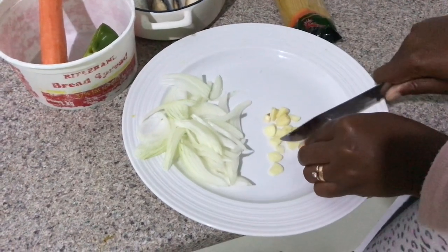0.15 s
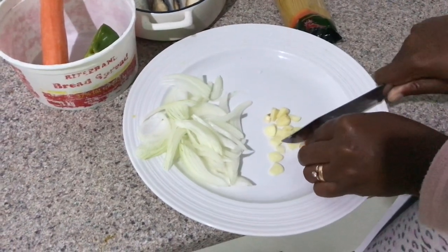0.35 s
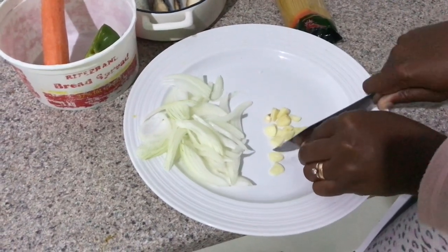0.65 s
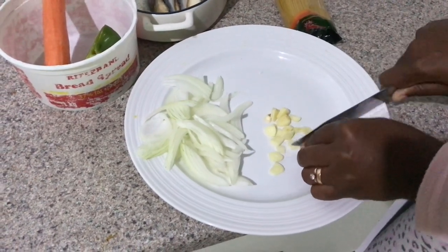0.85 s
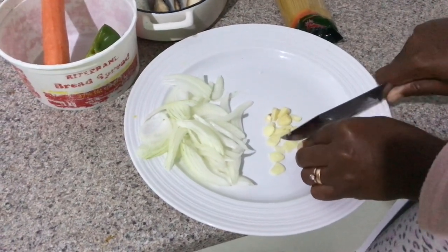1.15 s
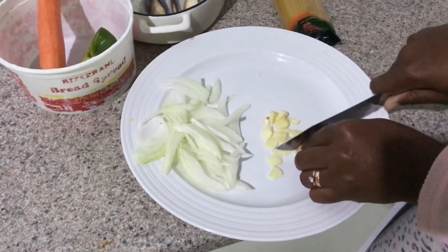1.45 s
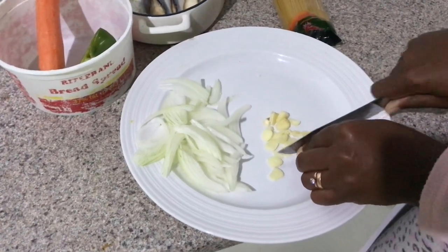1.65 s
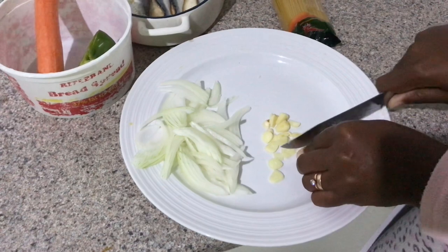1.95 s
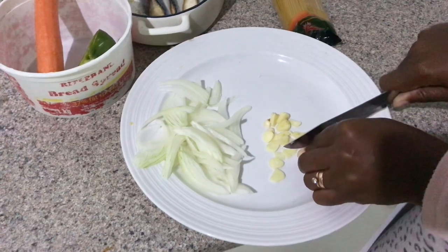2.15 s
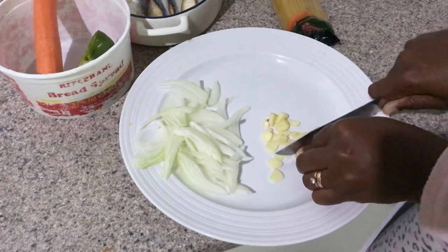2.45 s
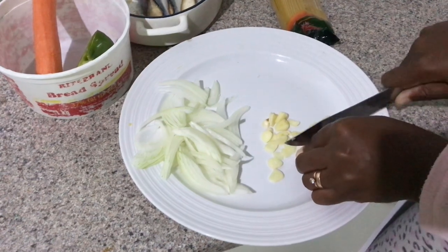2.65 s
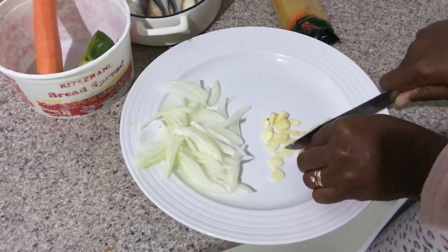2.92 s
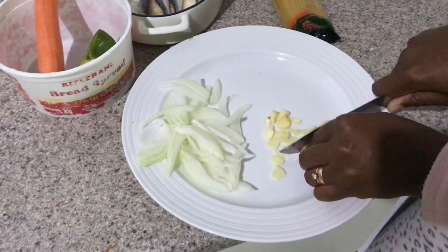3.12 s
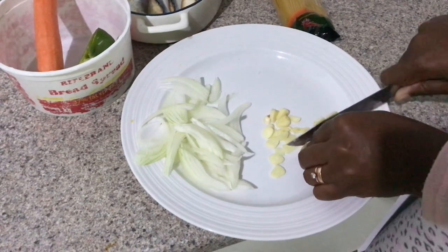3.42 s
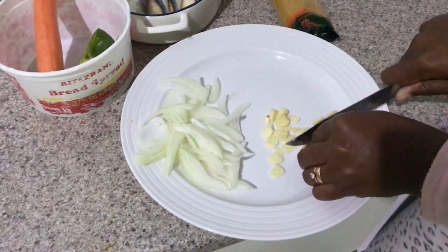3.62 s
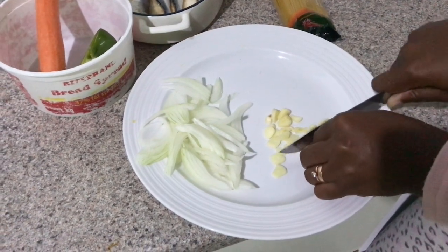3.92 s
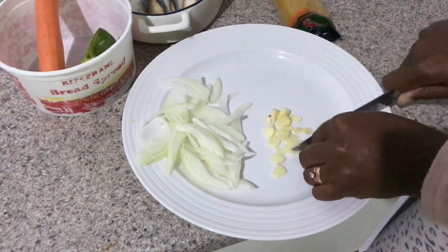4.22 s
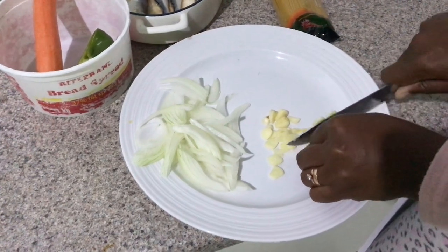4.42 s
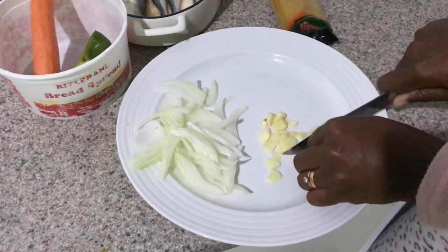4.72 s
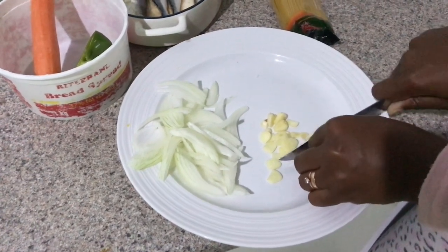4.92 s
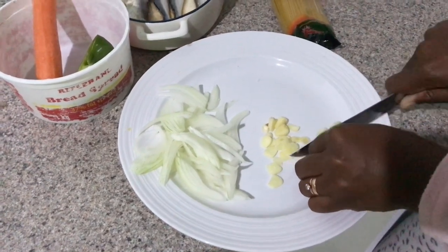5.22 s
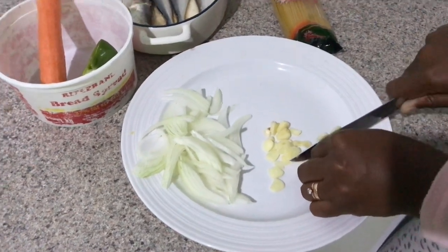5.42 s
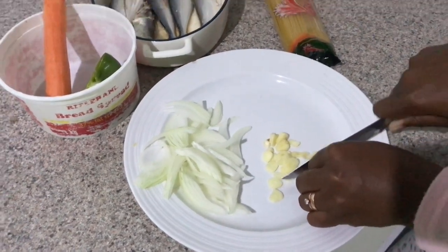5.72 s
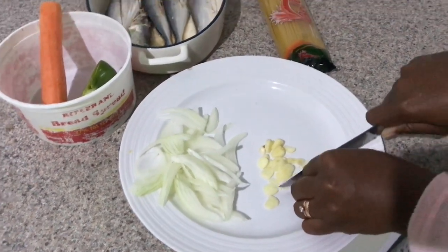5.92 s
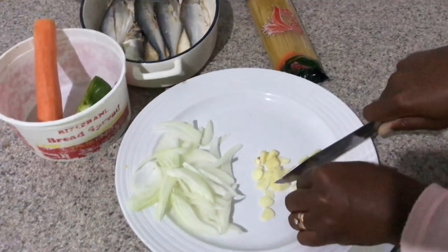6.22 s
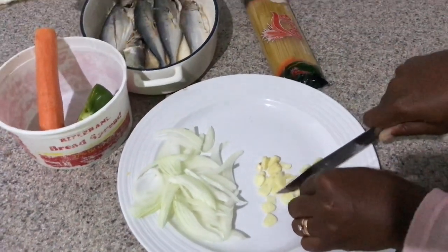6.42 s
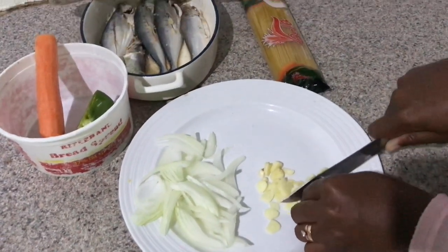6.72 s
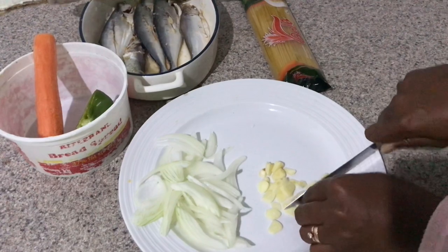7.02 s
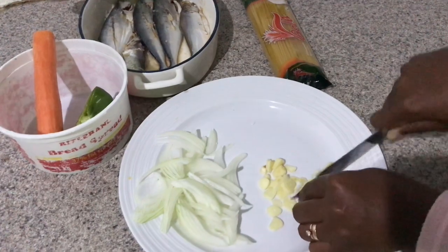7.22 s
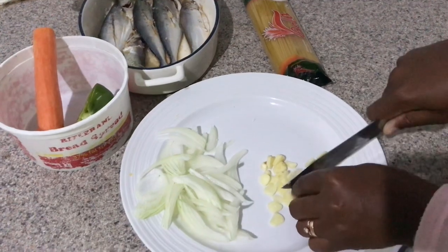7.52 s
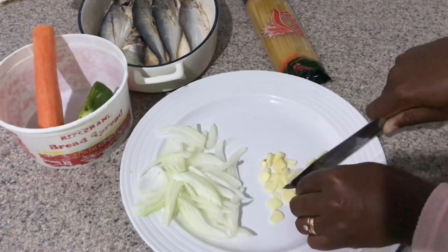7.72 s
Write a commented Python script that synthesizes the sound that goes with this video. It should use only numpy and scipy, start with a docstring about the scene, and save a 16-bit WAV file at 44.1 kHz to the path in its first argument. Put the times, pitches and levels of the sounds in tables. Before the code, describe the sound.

Eight hard clicks of a steel blade on a plate, unhurried and roughly a second apart, each noisy at the onset and ringing only briefly, with a short lively room tail. Between them the edge presses faintly through garlic, crunching softly, slices ticking wetly, with a brief scrape or two. Low muffled thumps from the hand holding the close microphone lie over faint steady hiss.

```python
"""A kitchen knife snaps down on a ceramic plate, about once a second: damped modes ring under a noisy crack.
Before most blows the edge crunches faintly through garlic, as unevenly modulated noise; slices tick wetly.
The plate knocks and booms on the worktop, and a small hard-walled kitchen answers with decaying noise.
The hand on the camera adds soft sagging bumps and rumble over a quiet hiss."""
import sys
import numpy as np
from scipy import signal
from scipy.fft import rfft, irfft, next_fast_len
from scipy.io import wavfile
from scipy.ndimage import map_coordinates

SR = 44100
rng = np.random.default_rng(int(sys.argv[2]) if len(sys.argv) > 2 else 0)


def int16_out(signal):
    """Quantize to a 16-bit WAV file."""
    q = np.round(np.clip(np.atleast_2d(signal).T, -1, 1) * 32767)
    wavfile.write(sys.argv[1], SR, q.astype(np.int16))


N = 346626
TIME = np.arange(N) / SR  # the whole scene, in s
AGE = np.arange(SR) / SR  # one second from the start of an event, in s

# Blade meets plate; the spot runs from -1 to 1 along the edge, crack and knock are relative levels.
# Columns: start_s, blow_db, brightness_db_per_octave, contact_spot, crack_db, knock_db
BLOWS = [(-.3, 0, -2.5, 0.77, -22, -42), (.624, -3, -0.55, -0.57, -20.5, -40),
         (1.537, 0.5, 1.5, -0.63, -22, -33.5), (2.344, 4, 1, -0.39, -21, -31.5),
         (3.075, 0.5, 0.8, -0.073, -22, -33.5), (4.045, 1, 0, -0.14, -26.5, -37.5),
         (4.8735, 0.5, 1.23, 0.98, -22, -35), (5.815, 1, 1.5, 0.56, -23, -35.5),
         (6.81, -.5, 0.86, 0.45, -23.5, -33.5)]
# Modes of the plate rocking on the worktop.
# Columns: pitch_hz, relative_level_db, t60_s
ROCKING_MODES = [(163, -10.5, 0.031), (246, -4.5, .06), (337, -3.5, 0.052), (429, 0, 0.037),
                 (440, -5, 0.067), (649.3, -5, 0.14), (704.3, 2.5, 0.06), (820, -1.5, 0.084),
                 (962, -6, 0.063), (1020, -0.5, 0.037)]


def blade_on_plate(knock_rise_s=0.0034):
    """Impact excitation: a hard blow rings the plate and rocks it against the worktop."""
    out = np.zeros(N)
    hz, mode_db, t60 = np.transpose(ROCKING_MODES)[:, :, None]
    for start, blow_db, bright_db, spot, crack_db, knock_db in BLOWS:
        phase = rng.random(hz.shape)
        modes = amp(mode_db) * fade(AGE, t60) * np.sin(2 * np.pi * (hz * AGE + phase))
        knock = amp(knock_db) * modes.sum(axis=0) * (1 - np.exp(-AGE / knock_rise_s))
        blow = amp(blow_db) * clink(bright_db, spot, crack_db=crack_db)
        add(out, start, blow + knock + in_kitchen(knock, wet_db=-2.0))
    return out


# Modes of plate and blade.
# Column: pitch_hz
MODE_HZ = [982, 1741, 1802, 2368, 2516, 2737, 2866, 3079, 3210, 3840, 4196, 4871, 6020, 6096, 6261, 7630,
           8226, 8368, 8497, 9044, 10530, 11543, 12214, 13030, 13485, 14076]
# The same modes in order; the last column is the gain as the contact spot moves by 1.
# Columns: relative_level_db, t60_s, spot_gain_db
MODE_RESPONSE = [(-30.5, 0.045, -7), (-26.5, .11, -4), (-26.5, 0.027, -6.5), (-33.5, 0.029, -10.5),
                 (-29, 0.017, -0.5), (-38, 0.022, 0), (-25.5, .07, -1.5), (-28.5, 0.059, -11.5),
                 (-23, 0.023, 2.5), (-40.5, .08, 1.5), (-28.5, 0.026, -6), (-43.5, .1, -6.5),
                 (-21.5, 0.083, 0), (-28.5, .04, 2.5), (-22.5, 0.049, 1.5), (-28.5, 0.055, 5),
                 (-17, 0.028, 0.5), (-20.5, .035, 3.5), (-22.5, 0.031, 1.5), (-34, .12, 6), (-35, .13, -4),
                 (-30, .065, 6.5), (-37, 0.06, 6.5), (-40, 0.076, 1.5), (-29.5, 0.048, 0.5),
                 (-39.5, .1, -1)]
# Relative spectrum of the contact's broad crack.
# Columns: frequency_hz, density_db
CRACK_SPECTRUM = [(60, -31.5), (250, -5.5), (620, -5), (950, 6.5), (1420, -22.5), (2400, -1), (3200, 11.5),
                  (3700, -7.5), (5200, -7), (8500, -6), (9800, -4), (13300, 0.5), (15000, -13)]
CRACK_T60_S = .014


def clink(bright_db, spot=0, scatter_db=0.0, attack_s=0.0005, crack_db=-21, chatter_s=0.0025,
          spread_t60_s=0.11, beam_hz=7000):
    """Modal superposition: decaying plate modes plus the crack of steel on glaze, with the room's answer."""
    hz = np.array(MODE_HZ)[:, None]
    mode_db, t60, spot_db = np.transpose(MODE_RESPONSE)[:, :, None]
    t = AGE[:SR // 4]

    def hardness(f):
        """Contact stiffness: a spectral tilt about 4 kHz, constant below 1 kHz."""
        return amp(bright_db * np.log2(np.maximum(f, 1000) / 4000))

    # optional random level variation of each mode, off by default
    scatter = scatter_db * rng.standard_normal(hz.shape)
    strength = amp(mode_db + spot * spot_db + scatter) * hardness(hz)
    phase = rng.random(hz.shape)
    modes = strength * fade(t, t60) * np.sin(2 * np.pi * (hz * t + phase))
    ring = modes.sum(axis=0) * (1 - np.exp(-t / attack_s))
    # the edge chatters for a moment before it settles: the crack holds its level, then decays
    settling = fade(np.maximum(t - chatter_s, 0), CRACK_T60_S)
    crack = amp(crack_db) * filtered(noise(CRACK_SPECTRUM, len(t)), hardness) * settling
    # the first burst fills the room; the late ring and the crack's treble are mostly heard directly
    wide_crack = filtered(crack, lambda f: 1 / np.sqrt(1 + (f / beam_hz) ** 2))
    spread = ring * fade(t, spread_t60_s) + wide_crack
    direct, spread = np.pad([ring + crack, spread], [(0, 0), (0, SR - len(t))])
    return direct + in_kitchen(spread, wet_db=-1.5)


# Relative spectrum of low rumble, shared by worktop, pressing blade and hand.
# Columns: frequency_hz, density_db
RUMBLE_SPECTRUM = [(20, -34), (40, -7), (62, 4), (110, 0.5), (170, -8.5), (250, -18.5), (450, -33.5),
                   (1000, -72)]
BOOM_DB, BOOM_T60_S, BOOM_RISE_S = -17.5, 1, .012  # level is relative to each knock


def worktop_boom():
    """Structure-borne sound: each knock leaves a low decaying boom in proportion to its strength."""
    out = np.zeros(N)
    for start, *_, knock_db in BLOWS:
        envelope = (1 - np.exp(-AGE / BOOM_RISE_S)) * fade(AGE, BOOM_T60_S)
        add(out, start, amp(knock_db + BOOM_DB) * noise(RUMBLE_SPECTRUM, SR) * envelope)
    return out


# The edge scrapes the glaze near a blow or a cut.
# Columns: start_s, relative_level_db, length_s, brightness_db_per_octave
SCRAPES = [(0.576, -40.5, 0.046, -6), (.892, -29.5, 0.068, -7), (3.051, -28.5, .02, -1.5)]


def scraping(slips_per_s=1100, uneven_db=3):
    """Stick-slip friction: the edge catches and slips on the glaze in a random run of tiny clinks."""
    out = np.zeros(N)
    for start, level_db, length, bright_db in SCRAPES:
        sizes = np.sign(rng.standard_normal(SR)) * amp(uneven_db * rng.standard_normal(SR))
        slips = sizes * (rng.random(SR) < slips_per_s / SR) * (AGE < length)
        impulses = unit(slips) / np.sqrt(SR)  # total energy 1
        add(out, start, amp(level_db) * signal.fftconvolve(impulses, clink(bright_db)))
    return out


# The blade enters the clove and cuts until it meets the plate; levels are relative.
# Columns: start_s, tap_db, crunch_db, wet_hiss_db
SLICES = [(.405, -51, -62.5, -66), (1.387, -40, -56.5, -64.5), (2.255, -52.5, -59.5, -63.5),
          (2.897, -32, -55.5, -65), (3.786, -41.5, -61.5, -67.5), (4.685, -40.5, -59.5, -65.5),
          (5.623, -47, -60, -62.5)]
# Relative spectrum of the crunch.
# Columns: frequency_hz, density_db
CRUNCH_SPECTRUM = [(80, -10.5), (300, 11), (600, -4), (1000, 1.5), (1450, -13.5), (1770, -1.5),
                   (2150, -16.5), (2900, -15), (4500, -21.5), (6100, -32), (9000, -22)]
# Relative spectrum of the wet hiss.
# Columns: frequency_hz, density_db
JUICE_SPECTRUM = [(2000, -25), (5000, -11.5), (8500, -4), (10000, -4.5), (13000, 2.5), (16000, -3)]
PRESS_DB = -61  # the worktop's rumble while the blade bears down


def slicing(grain_db=4, grains_per_s=600, uneven_db=8.5, catches_per_s=35, attack_s=0.0097, release_s=0.0079):
    """Fracture noise: a cushioned tap breaks the skin, then cells burst unevenly until the next blow."""
    out = np.zeros(N)
    for start, tap_db, crunch_db, hiss_db in SLICES:
        end = min(s for s, *_ in BLOWS if s > start)
        stroke = np.clip(AGE / attack_s, 0, 1) * np.clip((end - start - AGE) / release_s, 0, 1)
        cells = unit(amp(grain_db * wobble(grains_per_s) + uneven_db * wobble(catches_per_s)))
        # the plate carries the crunch, which eases as the clove gives way
        crunch = amp(crunch_db) * noise(CRUNCH_SPECTRUM, SR) * fade(AGE, t60=1.0)
        hiss = amp(hiss_db) * noise(JUICE_SPECTRUM, SR)
        cut = stroke * cells * (crunch + hiss)
        press = amp(PRESS_DB) * stroke * noise(RUMBLE_SPECTRUM, SR)
        # the clove cushions the tap, so mainly the plate's low modes answer
        cushion = signal.butter(1, 2000, fs=SR, output="sos")
        tap = signal.sosfilt(cushion, clink(bright_db=-6.5, crack_db=-23.5))
        add(out, start, amp(tap_db + 4) * tap + cut + press + in_kitchen(cut, wet_db=-4.0))
    return out


# The clearest wet ticks of sticky slices.
# Columns: start_s, relative_level_db
CLEAR_TICKS = [(0.385, -51.5), (0.8921, -49.5), (0.923, -48), (1.3701, -45), (2.8797, -47), (4.6841, -42.5),
               (5.623, -45.5), (7.597, -47)]
# Relative spectrum of one tick.
# Columns: frequency_hz, density_db
TICK_SPECTRUM = [(3000, -19), (7000, -7), (10000, 0), (14000, 5), (16000, -0.5)]
# the fainter ticks come at random, on the same relative level scale, within plus or minus the spread
FAINT_TICKS_PER_S, FAINT_TICK_DB, FAINT_SPREAD_DB = 5.1, -58.5, 3.5


def wet_ticks():
    """Adhesive release: sticky slices part in short noise bursts, a few clear among many faint ones."""
    out, t = np.zeros(N), AGE[:SR // 20]
    chance = rng.random((round(FAINT_TICKS_PER_S * N / SR), 2))
    faint = [(when * N / SR, FAINT_TICK_DB + FAINT_SPREAD_DB * (2 * size - 1)) for when, size in chance]
    for start, level_db in CLEAR_TICKS + faint:
        add(out, start, amp(level_db - 3.0) * noise(TICK_SPECTRUM, len(t)) * fade(t, t60=0.016))
    return out


# Decay of the room's diffuse tail.
# Columns: frequency_hz, t60_s
ROOM_DECAY = [(150, .75), (400, .75), (1000, .7), (2800, .66), (6000, .56), (8500, .48), (11500, .39),
              (13500, .34), (15500, .22)]
# Colour that the walls give the tail.
# Columns: frequency_hz, reflected_db
WALL_COLOUR = [(200, 6.5), (700, -1.5), (1750, 5.5), (2550, 4), (3250, -8.5), (4200, 0), (6200, -6),
               (8300, -9), (11000, -3.5), (13500, -1), (15000, -8.5)]


def in_kitchen(x, wet_db=-4.0, early_db=-10, early_t60_s=0.1, build_s=0.0026):
    """Reverberation: quick worktop reflections and the room's diffuse tail, without the direct sound."""
    hz, t, cells = signal.stft(rng.standard_normal(SR), SR, nperseg=256)
    decaying = cells * fade(t, along(ROOM_DECAY, hz)[:, None])
    tail = unit(signal.istft(decaying, SR, nperseg=256)[1][:SR]) / np.sqrt(SR)
    tail = filtered(tail, lambda f: amp(along(WALL_COLOUR, f))) * (1 - np.exp(-AGE / build_s))
    # the reflections arrive after the first millisecond
    early = rng.standard_normal(SR) * fade(AGE, early_t60_s) * (AGE > .001)
    early = unit(early) / np.sqrt(SR)
    return signal.fftconvolve(x, amp(wet_db) * tail + amp(early_db) * early)[:len(x)]


# The hand shifts its grip on the camera.
# Columns: start_s, length_s, rumble_db
GRIP_SHIFTS = [(.44, 0.16, -46), (1.01, 0.33, -48.5), (1.4, 0.31, -52), (1.85, 0.14, -60.5),
               (2.17, .14, -58), (2.91, 0.086, -53.5), (3.48, 0.073, -62), (4.82, 0.073, -49),
               (5.15, 0.13, -51.5), (5.36, 0.3, -48), (5.93, 0.27, -49.5), (6.42, 0.22, -54)]
# Soft bumps of the hand on the camera, with the pitch at their onset.
# Columns: start_s, relative_level_db, pitch_hz
HAND_BUMPS = [(0.195, -28, 168), (0.462, -31, 150), (1.08, -29, 151), (2.184, -34.5, 139),
              (4.454, -29.5, 161.5), (5.172, -30.5, 110.2), (5.244, -27.5, 169), (6.115, -30, 152.4),
              (6.162, -28.5, 118), (6.598, -32, 113), (7.374, -36.5, 159), (7.699, -40.5, 257)]
SHIFT_ATTACK_S, SHIFT_RELEASE_S, SHIFT_EASE_DB_PER_S = 0.0083, .04, 8  # sets in, eases off, stops
HOLD_DB, TREMOR_DB, TREMOR_PER_S = -65, 2.5, 5  # rumble of the hand holding still, and how it wavers


def handling(swell_s=0.0046, sag_s=0.056):
    """Contact noise: the hand rumbles, more at grip shifts, and bumps sag in pitch as the pressure eases."""
    hold_db = HOLD_DB + TREMOR_DB * wobble(TREMOR_PER_S, TIME)
    out = amp(hold_db) * noise(RUMBLE_SPECTRUM, N)
    for start, length, level_db in GRIP_SHIFTS:
        onset = np.clip(AGE / SHIFT_ATTACK_S, 0, 1)
        stop = np.clip(1 - (AGE - length) / SHIFT_RELEASE_S, 0, 1)
        easing = amp(level_db - SHIFT_EASE_DB_PER_S * AGE)
        add(out, start, easing * onset * stop * noise(RUMBLE_SPECTRUM, SR))
    push = (AGE / swell_s) ** 2 * np.exp(2 * (1 - AGE / swell_s))  # peaks at 1 after swell_s
    for start, level_db, hz in HAND_BUMPS:
        cycles = hz * sag_s * np.log1p(AGE / sag_s)
        add(out, start, amp(level_db - 8.5) * push * np.sin(2 * np.pi * cycles))
    return out


# Relative spectrum of the quiet background.
# Columns: frequency_hz, density_db
QUIET_SPECTRUM = [(20, -9), (60, 8.5), (150, 0.5), (300, -2.5), (560, -9), (690, -3.5), (800, -12.5),
                  (1200, -13), (2500, -17), (5000, -21.5), (8000, -21), (10000, -23), (12500, -16.5),
                  (16000, -22)]


def quiet_hiss():
    """Stationary noise: a steady coloured floor."""
    return amp(-64.0) * noise(QUIET_SPECTRUM, N)


def amp(db):
    """Logarithmic level: decibels to gain."""
    return 10 ** (np.asarray(db) / 20)


def unit(x):
    """Normalization: x at rms 1."""
    return x / np.sqrt(np.mean(x ** 2) + 1e-20)


def along(points, hz):
    """Logarithmic interpolation: (Hz, value) points read on a log frequency axis."""
    f, v = np.transpose(points)
    return np.interp(np.log(hz + 1), np.log(f), v)


def filtered(x, response):
    """Linear filtering: the spectrum of x times a response of frequency."""
    m = next_fast_len(len(x) + 8192)
    return irfft(rfft(x, m) * response(np.fft.rfftfreq(m, 1 / SR)), m)[:len(x)]


def noise(spectrum, size):
    """Spectral shaping: white noise coloured by a dB spectrum, at rms 1."""
    return unit(filtered(rng.standard_normal(size), lambda hz: amp(along(spectrum, hz))))


def fade(t, t60):
    """Exponential decay: 60 dB in t60."""
    return np.exp(-np.log(1000) * t / t60)


def wobble(rate, t=AGE):
    """Random modulation: a curve over the times t through rate random knots a second."""
    return map_coordinates(rng.standard_normal(SR), [t * rate], order=1)


def add(track, s, sound):
    """Superposition: mix a sound into the track from time s on."""
    start = round(s * SR)
    part = sound[max(-start, 0):len(track) - start]
    track[max(start, 0):][:len(part)] += part


def scene():
    """Superposition: knife work and handling over the quiet hiss."""
    floor = quiet_hiss()
    knife = blade_on_plate() + worktop_boom() + scraping()
    garlic = slicing() + wet_ticks()
    return (knife + garlic + handling() + floor)[None]


def record(dry):
    """Anticausal resonance: the camera's filter lifts a band that swells ahead of sharp sounds; a low-pass ends it."""
    band_hz, width_hz, depth, top_hz = 3100, 46, 2.3, 16000

    def response(hz):
        """Resonance curve: a narrow lift at band_hz, and nothing from top_hz up."""
        colour = 1 - depth / (1 - 1j * (hz - band_hz) / width_hz)
        return colour * (hz < top_hz)

    return filtered(dry[0], response)[None]


dry = scene()
out = record(dry)
int16_out(out)
```